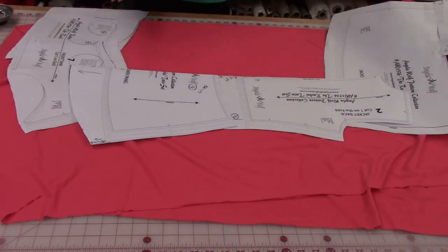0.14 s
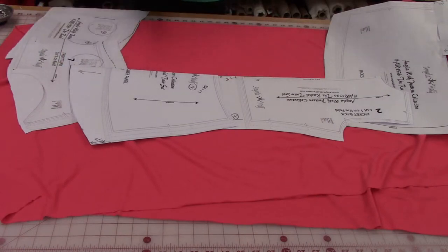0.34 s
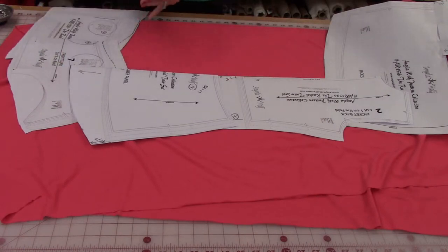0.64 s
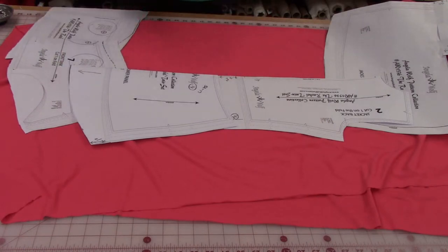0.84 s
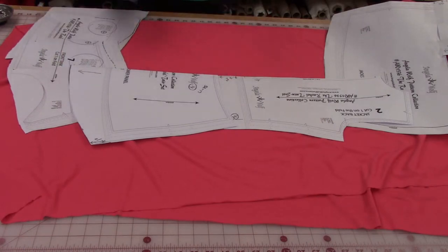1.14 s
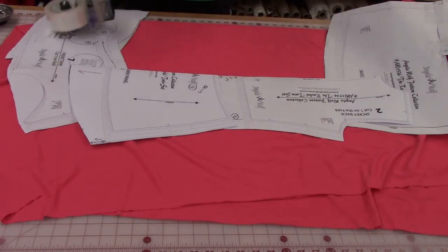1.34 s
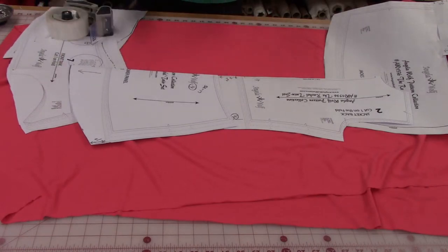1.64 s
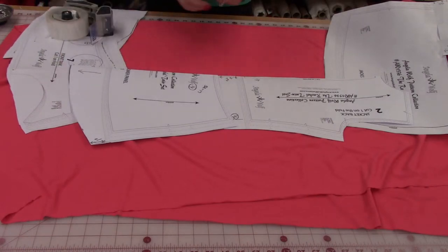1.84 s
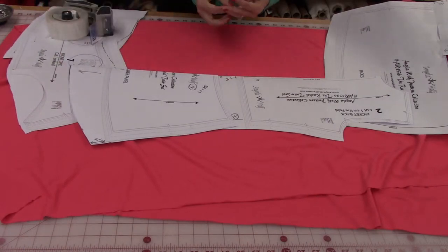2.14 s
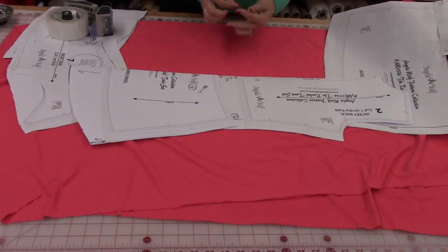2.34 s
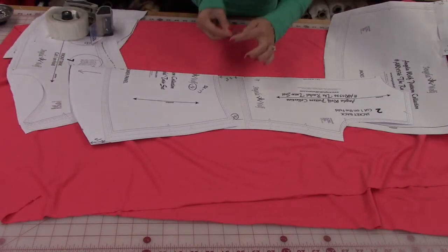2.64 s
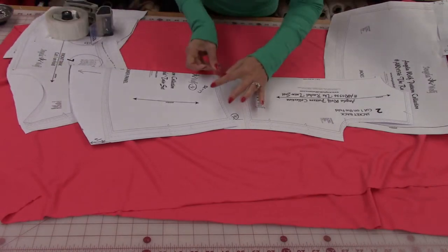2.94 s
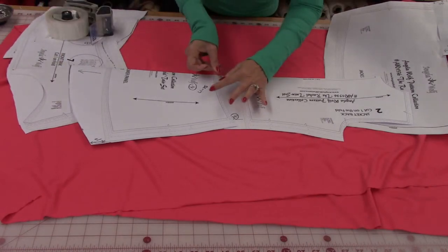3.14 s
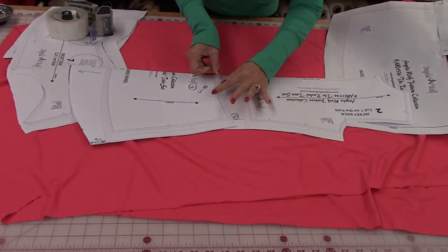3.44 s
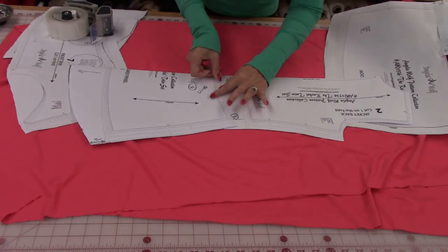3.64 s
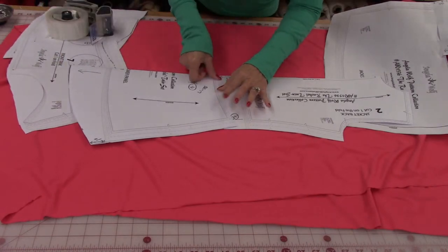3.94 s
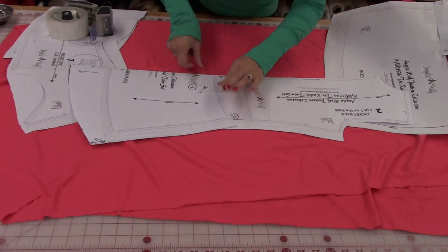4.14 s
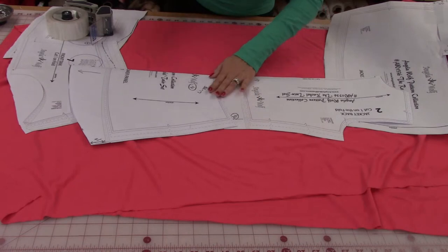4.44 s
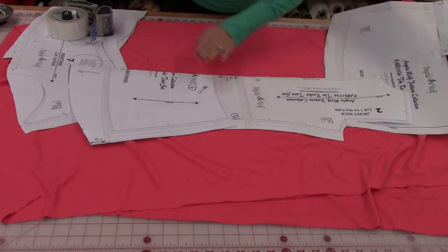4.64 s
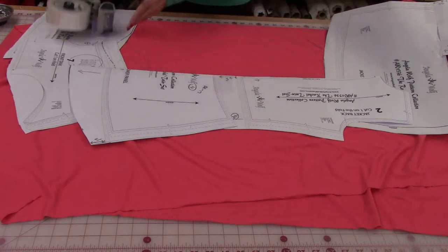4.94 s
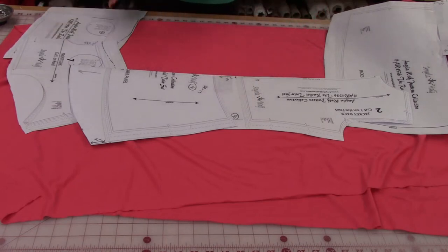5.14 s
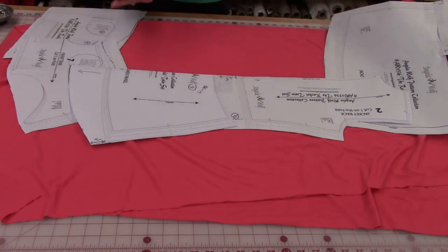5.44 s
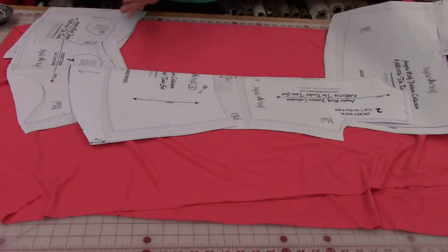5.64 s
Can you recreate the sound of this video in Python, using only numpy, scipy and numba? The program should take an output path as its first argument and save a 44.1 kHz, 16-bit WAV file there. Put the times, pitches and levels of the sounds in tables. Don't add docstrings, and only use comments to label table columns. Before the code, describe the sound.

A quick tearing pull of sticky tape and a sharp cut, a hard rattling set-down, then small sticky clicks, soft presses and late bright ticks.

```python
import sys
import numpy as np
from scipy import signal
from scipy.fft import rfft, irfft
from scipy.io import wavfile
from scipy.ndimage import uniform_filter1d, minimum_filter1d
from numba import njit

SR = 44100
rng = np.random.default_rng(int(sys.argv[2]) if len(sys.argv) > 2 else 0)


def amplitude_ratio(level_db):
    exponent = np.asarray(level_db, float) / 20
    return 10 ** exponent


def wav_out(sig):
    wavfile.write(sys.argv[1], SR, np.round(np.clip(np.atleast_2d(sig).T, -1, 1) * 32767).astype(np.int16))


N = 255339

# time_s, level_db, strip_hz, sizzle_db
PULL = [
    (.684, -36.5, 1704, -9.5),
    (.69, -19.5, 1708, 1),
    (.711, -20, 1751, -3.5),
    (.7135, -12.5, 1711, -8.5),
    (.76, -11.5, 1824, -4.5),
    (.80, -10, 1680, -3.5),
    (.835, -8.5, 1510, -5),
    (.859, -15, 1545, -9),
    (.875, -23, 1600, -17),
]
# centre_hz, width_hz, level_db
PULL_RESONANCES = [(415, 130, -8), (1124, 110, -16), (3000, 930, -1), (5200, 2621, -15), (10700, 4800, -6),
                   (13390, 3900, -10)]
# time_s, peak_db, ring_hz, sizzle_db
PICKS = [(.1925, -50, 2451, -24), (0.2009, -48, 2254, -31), (0.2256, -33.5, 2350, -13),
         (.2724, -36, 3674, -18), (0.301, -30.5, 4085, -10.5), (.3285, -24, 4800, -3),
         (.3321, -30, 5350, -15.5), (0.3458, -14.5, 5210, -5.5), (0.3581, -27, 5090, -7),
         (.394, -28, 5230, -7.5), (.4459, -28, 5768, -10), (0.4596, -16, 5120, -0.5),
         (0.4686, -22.5, 5497, -18.5), (0.5308, -19, 5096, 14), (0.5566, -18, 5450, -5.5),
         (0.57, -23, 2626, -8), (0.5812, -33.5, 3522, -23), (.6077, -36, 6245, -14.5),
         (0.6383, -35, 2700, 6), (5.348, -35.5, 2300, -3.5), (5.4318, -33, 5650, -2.5),
         (5.5792, -33.5, 4320, -10.5), (5.6098, -3.5, 5220, -5.5), (5.6172, -12, 3600, -8),
         (5.627, -6.5, 5660, -15.5), (5.634, -12.5, 3470, -10)]
# time_s, peak_db, ring_hz, sizzle_db
TEARS = [
    (0.667, -8.5, 5700, -16.5),
    (0.6926, 6, 5000, -7.5),
    (0.7126, 2.5, 2900, -7),
    (0.9975, -9.5, 4900, -17.5),
    (1.0359, -1.5, 4200, -11),
    (1.0376, -4, 1850, -14),
    (1.0445, -3.5, 3800, -13),
    (1.0455, -9, 1300, -18),
]
# time_s, peak_db, ring_hz, sizzle_db
RATTLES = [
    (1.48, -44, 1520, -10.5),
    (1.585, -39, 2990, -37.5),
    (1.5941, -23, 2570, -37.5),
    (1.6003, -18, 2390, -24),
    (1.6202, -17, 2900, -29.5),
    (1.6309, 0.5, 2994, -17),
    (1.6352, -4, 4300, -39),
    (1.6546, -21.5, 3250, -21.5),
    (1.8366, -39, 3130, -18.5),
    (1.8974, -38, 3710, -6.5),
]
# time_s, peak_db, ring_hz, sizzle_db
STICKS = [(2.2562, -31, 7360, 16), (2.3116, -49, 4920, -9), (2.3518, -14.5, 2160, -13),
          (2.386, -35, 2140, -28), (2.4088, -34.5, 2590, -26.5), (2.435, -29, 2880, -7),
          (2.476, -24, 3200, -7), (2.5025, -7, 2290, -2), (2.5069, -13.5, 2960, -39), (2.512, -2, 3000, 26),
          (2.5383, -23, 2120, -28.5), (2.634, -44, 2830, -13.5), (2.7022, -26, 3100, -11.5),
          (2.8553, -36, 8900, -4), (2.862, -30, 9000, -5), (2.8695, -26, 8500, -10),
          (2.884, -22.5, 5330, -8)]
# time_s, peak_db, ring_hz, sizzle_db
PRESSES = [
    (2.7408, -17.5, 3900, -3.5),
    (2.8925, -12, 1510, -12),
    (2.909, -26, 1200, -19),
    (4.1075, -15, 3830, -3),
    (4.4883, -19.5, 2020, -45),
    (4.4961, -29, 1588, -2),
    (4.9686, -41, 2470, -26),
    (5.085, -41, 2025, -29),
    (5.7332, -11, 3940, -4),
]
# time_s, peak_db, ring_hz, sizzle_db
FLICKS = [
    (1.3462, -25, 3250, -40),
    (4.1, -52.5, 5202, -12.5),
    (3.998, -36, 3850, -5),
    (4.0008, -5, 4450, -22.5),
    (1.7178, -5, 2970, -27),
    (4.008, -18, 4800, -10),
    (4.115, -30, 6700, -22),
    (4.05, -22, 5800, -21),
    (4.028, -38, 5200, -19),
    (4.18, -27, 7100, -19),
]
# snap_body_db, snap_ms, crumple_body_db, crumple_sizzle_db
KINDS = [(-29, 1.2, -24, -8.5), (-27.5, 1.2, -25.5, -8), (-22.5, 1.8, -13.5, -25),
         (-22.5, 1.22, -22.5, -18), (-22, 1.52, -11.5, -26.5), (-36, .8, -32.5, -3)]
# width_per_pitch, click_db, overtone_ratio, overtone_db
RINGS = [(.36, -12, 1.9, -9), (.35, -13.5, 2.8, -6), (.45, -8.5, 1.7, -6), (.5, -10.5, 2.2, -8.5),
         (0.59, -7.5, 2.13, -5.5), (.4, -15, 1.6, -5.5)]
# middle_s, peak_db, ring_hz, length_ms
CRUMPLES = [(0.3333, -35.5, 5000, 48), (0.3594, -39, 5230, 4.3), (0.4597, -16.5, 4920, 11.2),
            (0.4727, -25, 5293, 7.9), (.5794, -27.5, 3517, 6.7), (0.6657, -14, 5900, 3.5),
            (1.004, -12.5, 2120, 2), (1.0325, -8, 4420, 3.6), (1.0385, 5.5, 1920, 2.8),
            (1.05, -16.5, 3900, 4), (1.3572, -27, 3100, 8.3), (1.6057, -19.5, 2370, 4.8),
            (1.632, -14.5, 4560, 3.3), (1.661, -15.5, 2000, 5.2), (1.7233, -22.5, 2160, 15.2),
            (2.3575, -26, 1930, 1.77), (2.5072, -6, 2950, 8.1), (2.545, -29, 2850, 6.2),
            (2.711, -29, 2900, 6.3), (2.751, -32, 3580, 5.5), (2.173, -48, 1600, 12), (5.301, -47, 3540, 9),
            (5.3737, -45.5, 2450, 8.3), (5.745, -27, 950, 12), (2.8912, -14, 4800, 5.9),
            (2.9148, -31.5, 4540, 14.5), (4.0033, -17, 5450, 6.1), (4.033, -37, 5200, 5),
            (4.488, -24.5, 2503, 5.4), (5.5825, -30.5, 5480, 6.65), (5.603, -21, 4670, 6.6),
            (5.64, -17, 5300, 12), (5.7345, -22, 3600, 2.5)]
# start_s, length_ms, slip_rate_hz, level_db
SQUEAKS = [
    (2.8745, 9.7, 3000, -33.5),
    (2.9045, 6.5, 1700, -37.5),
    (2.8965, 5.7, 1750, -36),
]
# time_s, peak_db, hit_mode_hz, contact_ms
THUDS = [(0.302, -58, 185, 1.6), (.999, -23, 494, 0.88), (1.018, -30.5, 484, 0.99), (1.6, -15.5, 167, 3.3),
         (1.627, -9, 251, 1.75), (1.647, -26, 170, 1.7), (1.674, -19, 192, 3.2), (1.718, -17, 330, 1.5),
         (1.734, -15, 157, 3.7), (2.352, -47, 318, 1.65), (2.354, -35, 501, 1.05),
         (2.512, -30.5, 521, 1.06), (2.744, -40, 555, 0.96), (4.129, -46, 304, 2.2),
         (4.485, -26.5, 336, 1.43), (4.494, -22.5, 181, 1.93), (4.971, -44.5, 246, 2.16),
         (5.093, -50, 324, 1.64)]
# pitch_hz, level_db, t60_s
TABLE_MODES = [(162.6, -4.5, 0.28), (175.5, -6, 0.39), (202, -0.5, 0.2864), (243.7, 0, 0.098),
               (282.6, -6, 0.37), (336, -11, 0.35), (427.2, -1, 0.16), (535, -2, 0.13), (870, -0.5, 0.08)]
# pitch_hz, level_db, t60_s
BLADE_MODES = [(1215, -8.5, .3), (1870, -5, .3), (2040, -2, .4), (2110, 0, 0.34), (2200, -4, .3),
               (3510, -5.5, .35), (3930, -7.5, .35), (4680, -9.5, .3), (5260, -9, 0.24)]
BLADE_S = [1.037, .193, 5.352]
BLADE_LEVELS_DB = [-35, -60, -62]
# pitch_hz, level_db, t60_s
SCISSORS_MODES = [(2230, -10, 0.092), (2633, -4.5, 0.13), (3250, -2, 0.26), (3370, -5, 0.33),
                  (3400, -2.5, 0.31), (3430, -6.5, .15), (4540, -11.5, .12), (5120, -6, 0.14)]
# start_s, end_s, start_db, end_db, body_db
RUSTLE = [(0, .19, -65.5, -92, 7.5), (0.193, 0.255, -75, -55, -7), (0.257, 0.445, -61.5, -60, -11),
          (0.46, 0.658, -50, -58, 1), (2.153, 2.342, -85, -62, -2.5), (2.363, 2.5, -52, -65, 3.5),
          (2.58, 2.706, -77, -66, -3), (2.723, 2.87, -49, -67.5, 0.5), (3.756, 3.992, -85, -82, -6.5),
          (4.016, 4.105, -53, -58.5, -6), (4.126, 4.181, -55.5, -75, 2), (4.18, 4.235, -72, -69.5, -0.5),
          (4.233, 4.281, -62.5, -70.5, -3.5), (4.802, 4.939, -78, -101, 0), (4.945, 4.959, -77, -64, -9),
          (4.958, 5.052, -53, -62.5, -7.5), (5.054, 5.091, -59, -56.5, -9), (5.096, 5.158, -61, -85, 5.5),
          (5.27, 5.456, -85, -65.5, -8), (5.451, 5.602, -84, -52.5, -10), (5.64, 5.74, -38.5, -60, 2),
          (5.769, 5.796, -57, -36, 0)]
# centre_hz, width_hz, level_db
SHEET = [(2300, 270, 4), (3500, 390, 3), (4980, 370, -11), (5340, 590, -2), (6770, 1500, -8)]
# delay_ms, level_db
ECHOES = [(7.5, -7.5), (12.5, -16), (16.3, -30), (28, -22.5)]
# centre_hz, t60_s, level_db
TAIL = [(200, .3, -12), (400, .34, -9), (800, .36, -8), (1600, .36, -9), (3200, .34, -10), (6400, .27, -13),
        (12800, .17, -17)]
SPOT_S = [0, .66, .98, 1.3, 2.1, 3.5, 4.4, 5.2]
# echoes_db, scatter_db, tail_db
SPOTS = [(-7, 2, -6), (-10, -2.5, 3), (-7, -6, 1.5), (-12, 1.5, 0.5), (-29, -6, -9), (-4.5, -4.5, -5.5),
         (6, 5, -0.5), (-14.5, -7.5, -1)]
# pitch_hz, density_db_per_hz
HUM = [(30, -44), (102, -10.5), (208, -6.5), (673, -10.5), (1550, -12), (1970, -20), (2760, -20),
       (15500, -30)]
# centre_hz, width_hz, share_removed
TREBLE_DIP = (7650, 600, .6)


def unit(x):
    return x / np.sqrt(np.mean(x ** 2))


@njit
def svf(x, hz, width_hz):
    y, b, l = np.empty(len(x)), 0., 0.
    for i in range(len(x)):
        g, k = np.tan(np.pi * hz[i] / SR), width_hz / hz[i]
        v = (b + g * (x[i] - l)) / (1 + g * (g + k))
        b, l, y[i] = 2 * v - b, l + 2 * g * v, k * v
    return y


def band(x, hz, width_hz):
    return svf(x + 1e-18, hz + np.zeros(len(x)), float(width_hz))


def band2(x, hz, width_hz):
    return band(band(x, hz, width_hz), hz, width_hz)


def bell(f, hz, width_hz):
    return 1 / (1 + 1j * (f / hz - hz / f) * hz / width_hz)


def walk(rate_hz):
    k = int(SR / rate_hz)
    held = np.repeat(rng.standard_normal(N // k + 1), k)
    return 1.2 * uniform_filter1d(held, k)[:N]


def played(table):
    s, *columns = np.transpose(table)
    t = np.arange(N) / SR
    on = uniform_filter1d(1. * ((t >= s[0]) & (t <= s[-1])), size=200)
    return on, [np.interp(t, s, c) for c in columns]


def crackle(per_s, scatter_db):
    hit = rng.random(N) < per_s / SR
    strength = amplitude_ratio(scatter_db * np.minimum(rng.exponential(size=N), 4))
    return unit(hit * strength * np.sign(rng.random(N) - .3))


def add(out, s, x):
    i = int(s * SR)
    out[i:i + len(x)] += x[:N - i]


def pull():
    on, (db, strip_hz, sizzle_db) = played(PULL)
    drone_db = -3.5 + (0.14 - 1) * (db + 13.0)
    holder_db = -1 - 100 * np.clip(np.arange(N) / SR - PULL[0][0], 0, 1)
    slips = -crackle(2000, 3.8) * amplitude_ratio(1.6 * walk(250))
    parts = [amplitude_ratio(g) * unit(band2(slips, hz, 1.3 * w)) for hz, w, g in PULL_RESONANCES]
    drone, core, holder, film, *sizzle = parts
    strip = unit(band(slips, strip_hz * (1 + 0.085 * walk(60)), 800))
    broad = unit(band(band(slips, 4700, 7000), 3000, 12000))
    body = strip + core + film + amplitude_ratio(-4.0) * broad
    body = signal.sosfilt(signal.butter(2, 400, "high", fs=SR, output="sos"), body)
    rasp = body + amplitude_ratio(drone_db) * drone + amplitude_ratio(holder_db) * holder + amplitude_ratio(sizzle_db + 12) * sum(sizzle)
    return on * amplitude_ratio(db - 4.5) * rasp


def release(s, db, hz, body_db, sizzle_db, rings, envelope, noise):
    body_db = body_db - np.log2(hz / 3500)
    f = np.arange(1, 2050) * SR / 4096
    width, click_db, ratio, over_db = rings
    tone = bell(f, hz, width * hz) ** 2
    overtone = bell(f, ratio * hz, width * hz) ** 2
    click = bell(f, 3500, 6000) ** 2
    body = bell(f, 600, 2400) ** 4 / (1 + (540 / f) ** 6)
    sizzle = bell(f, 10300, 9000) ** 2
    colour = tone - amplitude_ratio(over_db) * overtone + amplitude_ratio(click_db) * click
    colour = colour + amplitude_ratio(body_db + 17.5) * body + amplitude_ratio(sizzle_db + 8) * sizzle
    kick = rfft(noise * envelope)
    even_kick = kick / uniform_filter1d(np.abs(kick), size=50)
    snap = irfft(even_kick * colour)
    return s - .02, snap * amplitude_ratio(db) / np.abs(snap).max()


def snap_rows():
    tables = [PICKS, TEARS, RATTLES, STICKS, PRESSES, FLICKS]
    return sorted((*row, kind, rings) for table, kind, rings in zip(tables, KINDS, RINGS) for row in table)


def snaps():
    out, t_ms = np.zeros(N), np.arange(4096) * 1000 / SR - 20
    rows = snap_rows()
    for row, noise in zip(rows, rng.standard_normal((len(rows), len(t_ms)))):
        s, db, hz, sizzle_db, (body_db, ms, _, _), rings = row
        late = (t_ms - .8) / ms
        sharp = np.exp(-np.abs(late) * np.where(late < 0, 2.5, 1.5))
        envelope = sharp + amplitude_ratio(-18.0) * np.exp(-np.abs(late) / 2.2)
        add(out, *release(s, db, hz, body_db, sizzle_db, rings, envelope, noise))
    return out


def crumples():
    out, t_ms = np.zeros(N), np.arange(4096) * 1000 / SR - 20
    rows = snap_rows()
    for (s, db, hz, ms), noise in zip(CRUMPLES, rng.standard_normal((len(CRUMPLES), 2, len(t_ms)))):
        nearest = min(rows, key=lambda row: abs(row[0] - s))
        (_, _, body_db, sizzle_db), rings = nearest[-2:]
        late = (t_ms - 1.5) / ms * np.where(t_ms < 1.5, 1.8, 1)
        envelope = np.exp(-np.abs(late) ** 1.6)
        grains = noise[0] * amplitude_ratio(4.5 * np.repeat(noise[1, ::32], 32))
        add(out, *release(s, db, hz, body_db, sizzle_db, rings, envelope, grains))
    return out


def squeaks():
    out, t = np.zeros(N), np.arange(800) / SR
    for (s, ms, hz, db), chance in zip(SQUEAKS, rng.standard_normal((len(SQUEAKS), 800))):
        jitter = 0.14 * uniform_filter1d(chance, size=20)
        phase = 2 * np.pi * np.cumsum(hz * (1 + jitter)) / SR
        buzz = sum(np.cos(k * phase) * abs(bell(k * hz, 7000, 6100)) for k in range(1, 7))
        envelope = np.clip(np.minimum(t * 1000, ms - t * 1000), 0, 1)
        add(out, s, amplitude_ratio(db) * (unit(buzz) + 0.56 * chance) * envelope)
    return out


def ring(modes, t, mix):
    out = 0
    for (hz, db, t60), (level, detune) in zip(modes, mix):
        tone = np.sin(2 * np.pi * hz * (1 + 0.05 * detune) * t)
        out = out + amplitude_ratio(db + level) * tone * np.exp(-np.log(1000) * t / t60)
    return out


def thuds():
    out, t = np.zeros(N), np.arange(SR // 2) / SR
    for (s, db, hit_hz, ms), mix in zip(THUDS, rng.standard_normal((len(THUDS), len(TABLE_MODES), 2))):
        struck = [(hz, g - 30.0 * abs(np.log2(hz / hit_hz)), t60) for hz, g, t60 in TABLE_MODES]
        modes = ring(struck, t, mix)
        push = np.exp(-.5 * ((t[:600] * 1000 - ms) * 3 / ms) ** 2)
        boards = unit(band(rng.standard_normal(len(t)), 1.55 * hit_hz, 270))
        knock = amplitude_ratio(-2.5) * boards * np.exp(-t / 0.046)
        thud = signal.fftconvolve(modes + knock, push)
        add(out, s, thud * amplitude_ratio(db - 3.5) / np.abs(thud).max())
    return out


def metal():
    out, t = np.zeros(N), np.arange(SR // 2) / SR
    mixes = rng.standard_normal((len(BLADE_S), len(BLADE_MODES), 2))
    for s, db, mix in zip(BLADE_S, BLADE_LEVELS_DB, mixes):
        add(out, s, amplitude_ratio(db) * ring(BLADE_MODES, t, 0.14 * mix))
    add(out, 1.348, amplitude_ratio(-43) * ring(SCISSORS_MODES, t, np.zeros((len(SCISSORS_MODES), 2))))
    return out


def rustle():
    rub = (crackle(2500, 2.2) + .8 * rng.standard_normal(N)) * amplitude_ratio(2.5 * walk(60))
    sheet = amplitude_ratio(-20.0) * band(rub, 5850, 3260)
    for hz, w, g in SHEET:
        sheet = sheet + amplitude_ratio(g + 3.5 * walk(30)) * band2(rub, hz, 1.5 * w)
    sheet = unit(sheet)
    body = unit(band2(rub, 640, 960))
    sizzle = unit(band(band(rub, 5000, 4500), 10550, 7000))
    out = np.zeros(N)
    for start, end, start_db, end_db, body_db in RUSTLE:
        on, (db,) = played([(start, start_db), (end, end_db)])
        out += on * amplitude_ratio(db - 3.0) * (sheet + amplitude_ratio(body_db) * body + amplitude_ratio(-1.5) * sizzle)
    return out


def decay(hz, t60_s, db, t):
    noise = band2(rng.standard_normal(len(t)), hz, hz)
    wash = noise * np.exp(-np.log(1000) * t / t60_s) * (1 - np.exp(-t / 0.00023))
    return amplitude_ratio(db - 6.5) * wash * np.sqrt(hz / 3200 / np.sum(wash ** 2))


def room(x):
    t = np.arange(SR * 3 // 4) / SR
    echoes = np.zeros(len(t))
    for ms, db in ECHOES:
        smear = rng.standard_normal(60) * np.exp(-np.arange(60) / 8.0)
        add(echoes, ms / 1000, amplitude_ratio(db) * smear / np.sqrt(np.sum(smear ** 2)))
    scatter = sum(decay(hz, 0.086, db, t) for hz, _, db in TAIL)
    tail = sum(decay(hz, t60, db, t) for hz, t60, db in TAIL)
    spot = np.searchsorted(SPOT_S, np.arange(N) / SR, side="right") - 1
    paths = band(echoes, 3600, 8200), scatter, tail
    out = x
    for db, path in zip(np.transpose(SPOTS), paths):
        out = out + signal.fftconvolve(x * amplitude_ratio(db[spot]), path)[:N]
    return out


def gate(x):
    low = signal.sosfiltfilt(signal.butter(2, 600, fs=SR, output="sos"), x)
    power = uniform_filter1d((x - low) ** 2, size=60)
    power = -minimum_filter1d(-power, size=500)
    power = uniform_filter1d(power, size=300) / 3
    return low + (x - low) * power / (power + amplitude_ratio(-69) ** 2)


def hum():
    hz, db = np.transpose(HUM)
    out = 0
    for f in 32 * 2 ** np.arange(0, 9, 1 / 3):
        level_db = np.interp(np.log(f), np.log(hz), db) + 2.6 * walk(20)
        out = out + amplitude_ratio(level_db) * band2(rng.standard_normal(N), f, f / 3)
    return unit(out) * amplitude_ratio(-67.5)


def scene():
    sharp = snaps() + crumples() + squeaks() + pull() + amplitude_ratio(-2.0) * thuds() + metal()
    heard = gate(room(sharp)) + rustle()
    mic = signal.butter(2, [170, 10650], "band", fs=SR, output="sos")
    heard = signal.sosfilt(mic, heard) + hum()
    return np.array([heard, heard])


def top_cut(x):
    return signal.sosfilt(signal.butter(12, 16960, fs=SR, output="sos"), x)


def record(dry):
    hz, width_hz, share = TREBLE_DIP
    x = dry[0] - share * band(dry[0], hz, width_hz)
    x = np.tanh(1.25 * x) / 1.25
    x = signal.sosfilt(signal.butter(1, 60, "high", fs=SR, output="sos"), x)
    x = signal.sosfilt(signal.ellip(6, .2, 32, 15900, fs=SR, output="sos"), x)
    return top_cut(np.array([x, x]))


dry = scene()
out = record(dry)
wav_out(out)
```